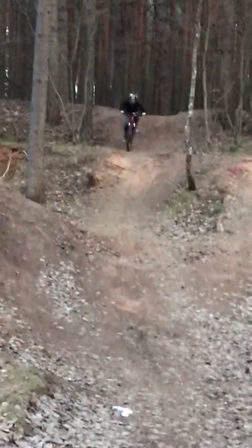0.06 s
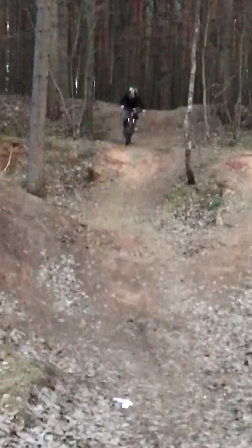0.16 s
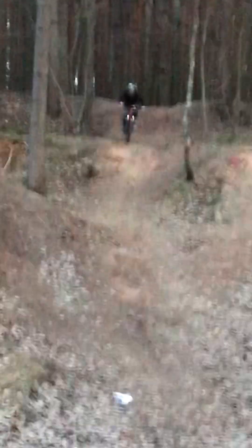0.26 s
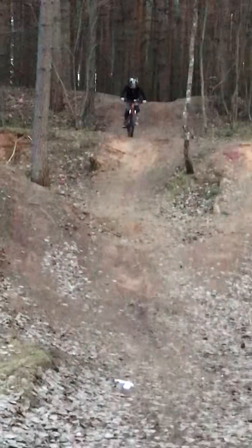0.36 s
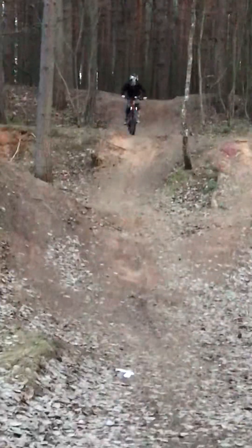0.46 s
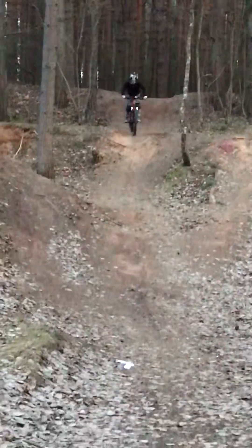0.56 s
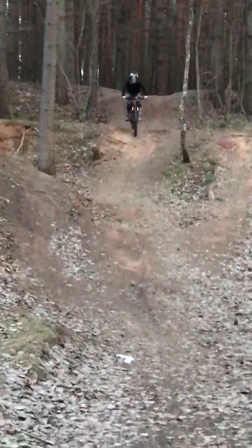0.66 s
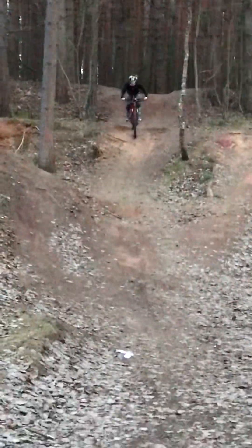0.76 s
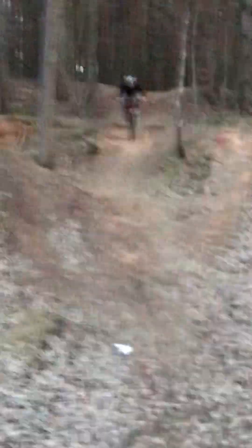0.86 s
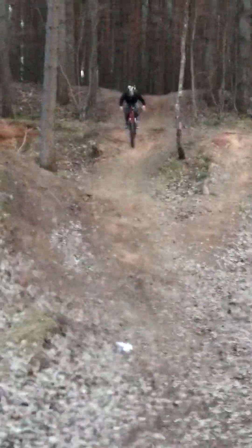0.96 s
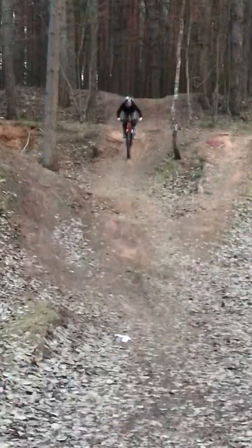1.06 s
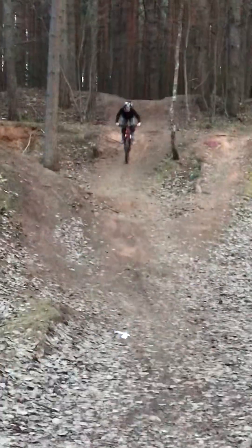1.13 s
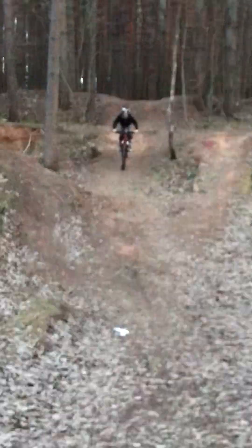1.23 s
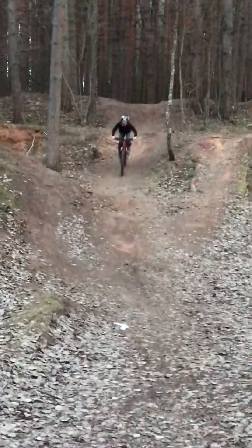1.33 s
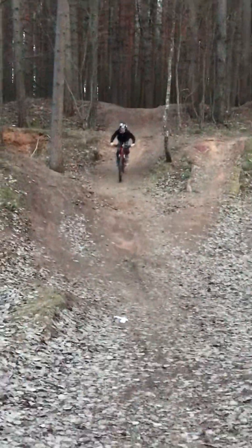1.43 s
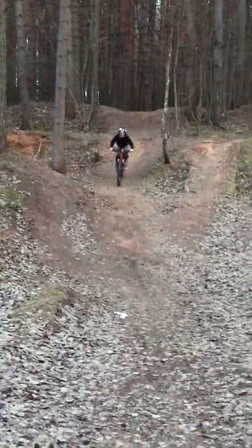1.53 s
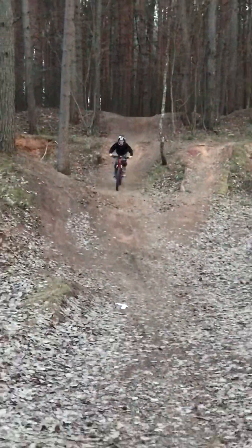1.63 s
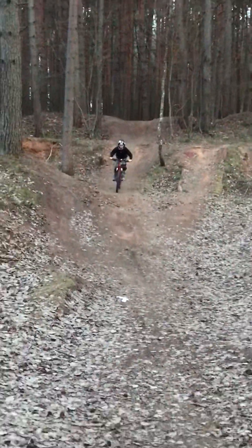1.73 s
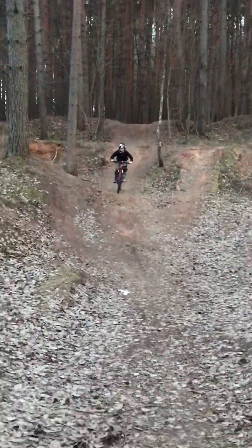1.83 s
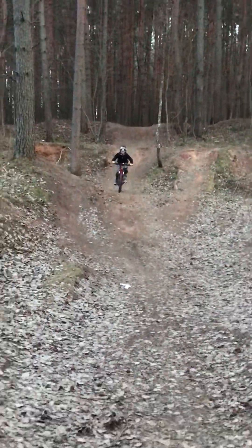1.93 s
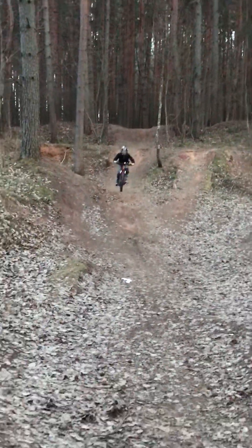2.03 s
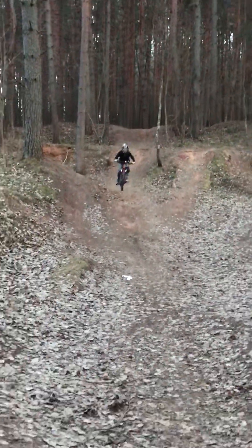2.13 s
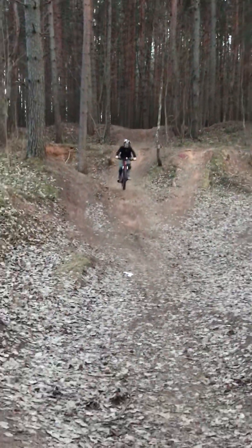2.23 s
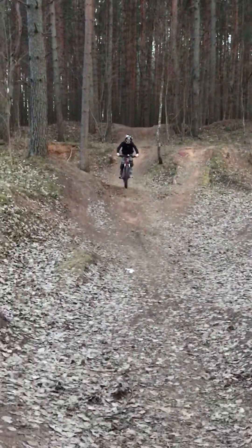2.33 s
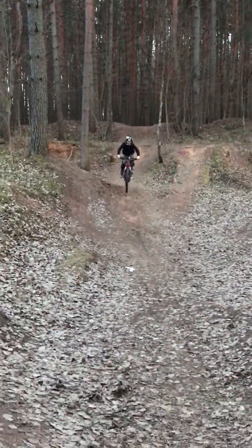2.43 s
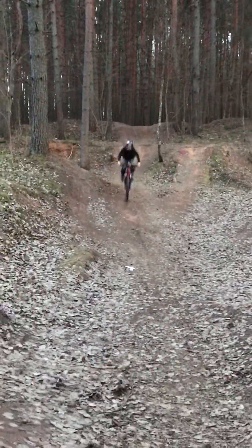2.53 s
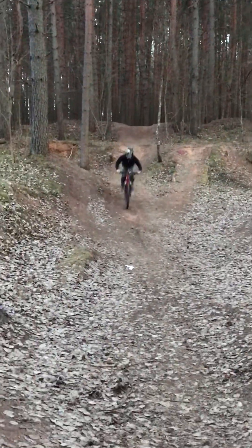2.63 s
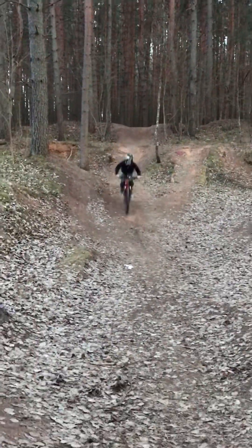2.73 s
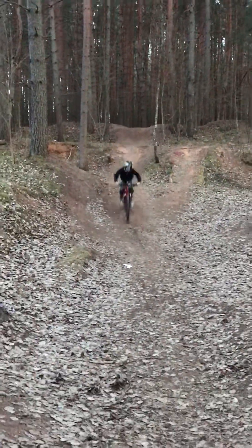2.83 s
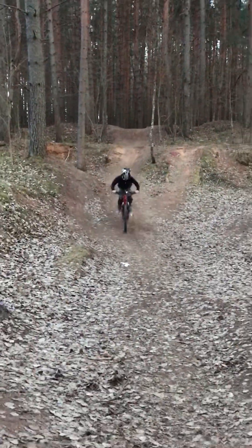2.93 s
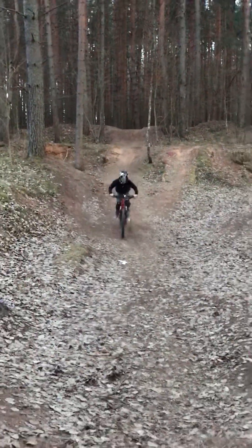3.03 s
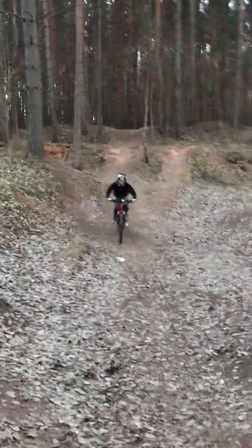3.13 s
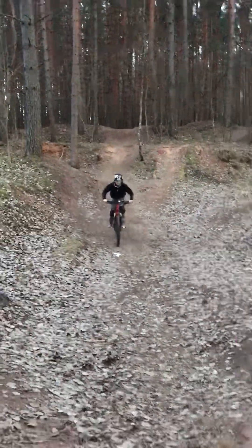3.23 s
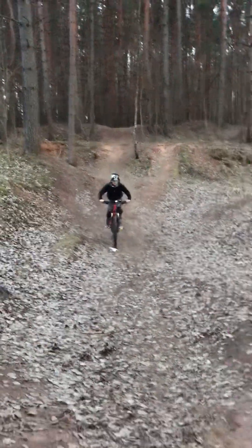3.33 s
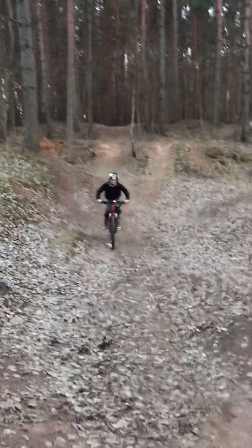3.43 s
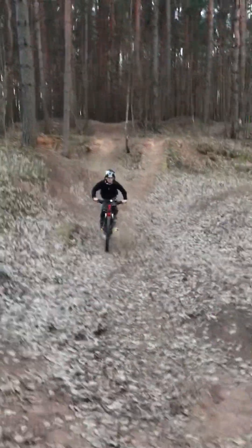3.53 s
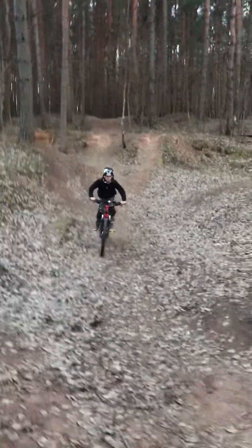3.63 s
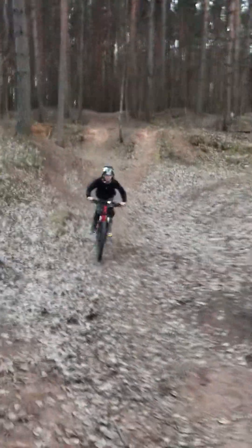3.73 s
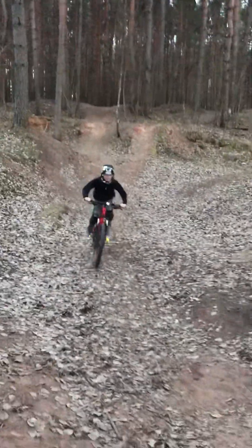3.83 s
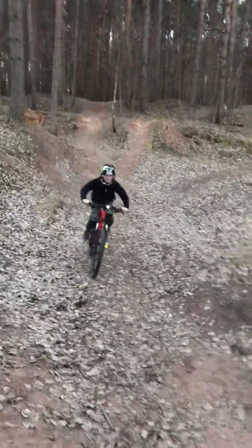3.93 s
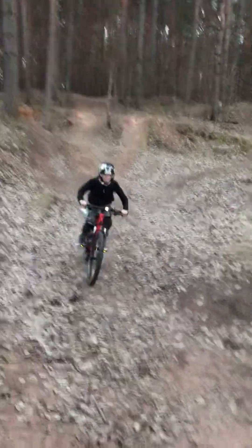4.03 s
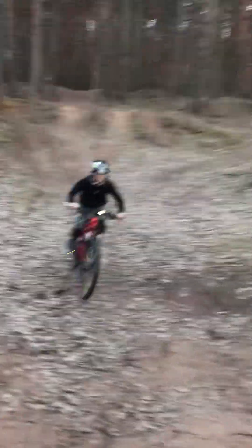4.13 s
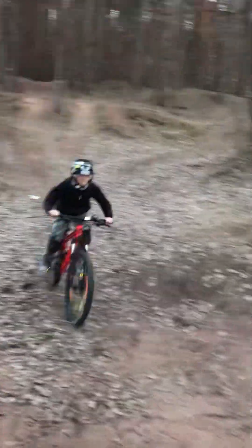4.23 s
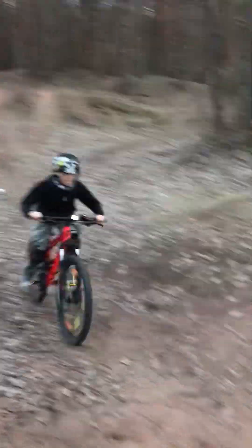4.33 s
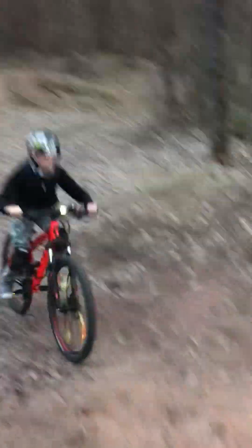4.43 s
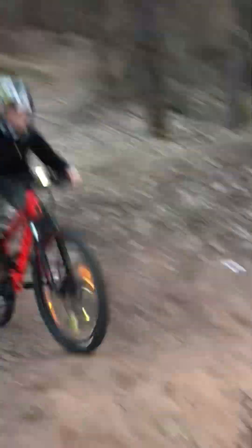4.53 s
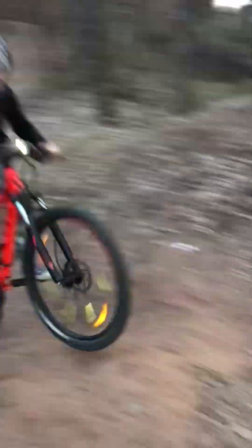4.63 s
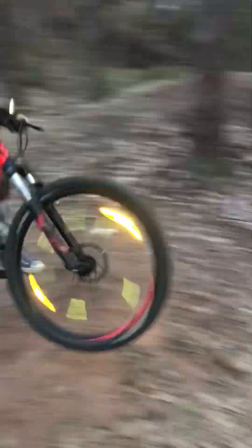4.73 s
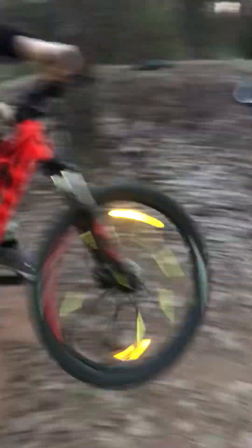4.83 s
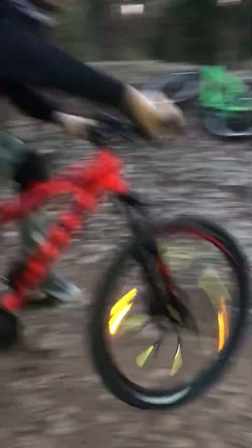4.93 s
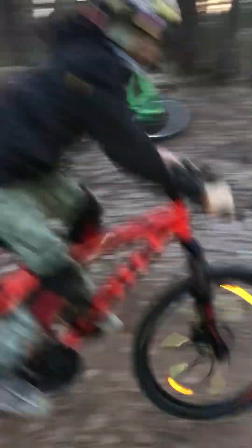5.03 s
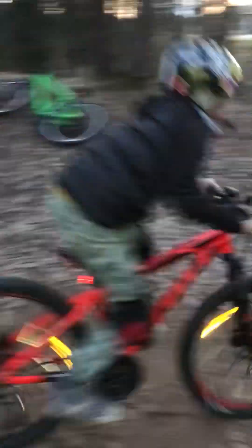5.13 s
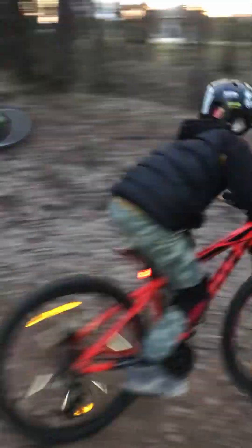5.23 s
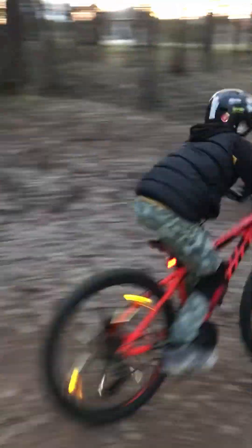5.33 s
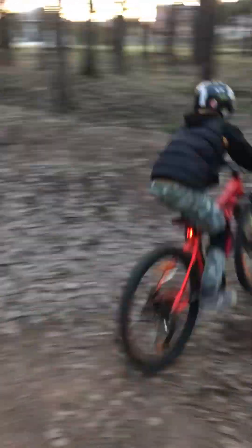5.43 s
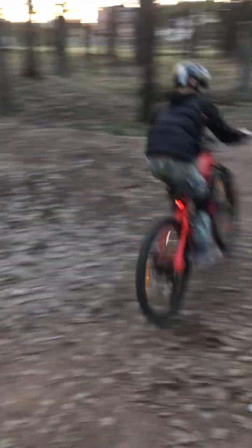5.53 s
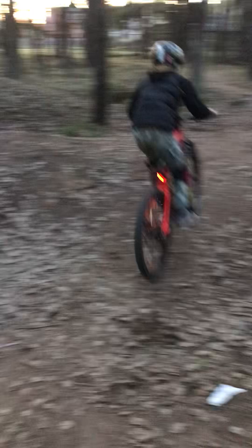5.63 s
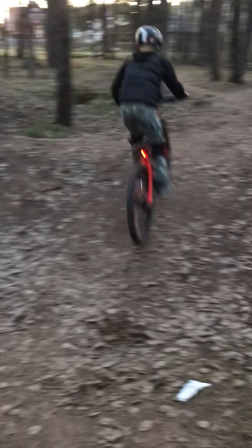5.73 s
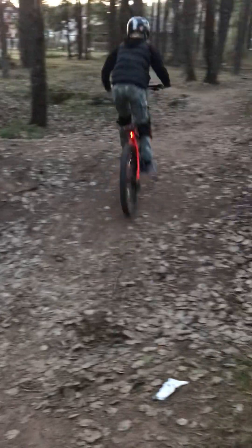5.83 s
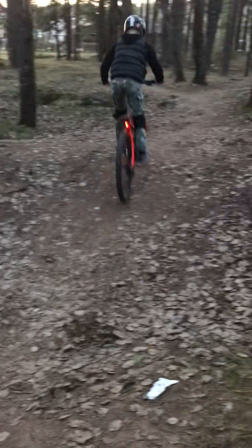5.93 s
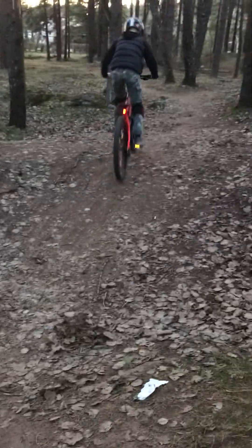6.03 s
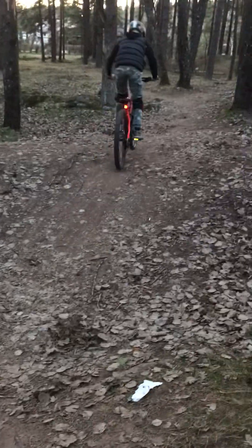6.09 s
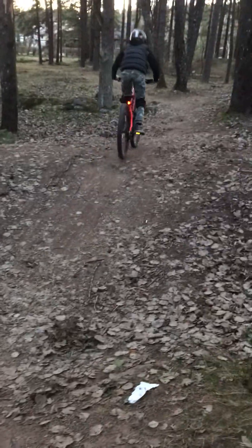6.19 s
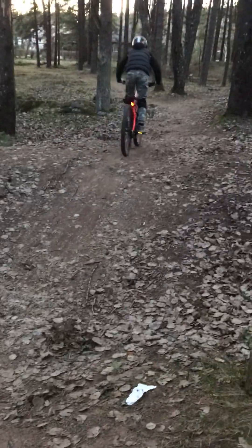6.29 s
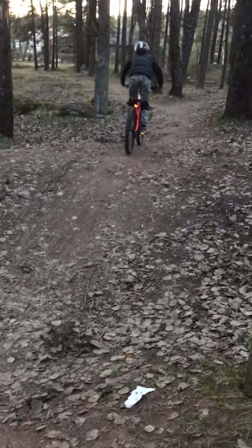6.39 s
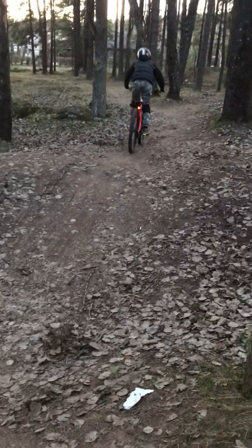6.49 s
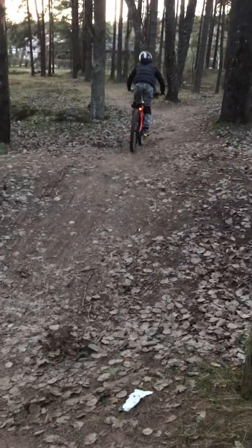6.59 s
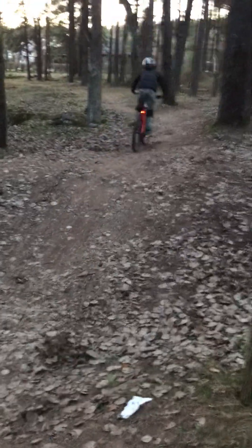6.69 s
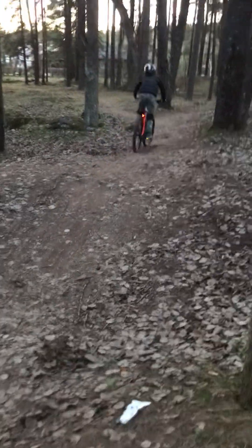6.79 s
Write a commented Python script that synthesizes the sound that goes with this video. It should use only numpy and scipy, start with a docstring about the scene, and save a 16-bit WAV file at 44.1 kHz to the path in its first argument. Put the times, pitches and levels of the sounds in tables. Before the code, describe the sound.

Quiet pine woods with bird calls; a rattling mountain bike approaches, bursts by in a clash of chain and thuds, then fades over leaves.

```python
"""Dirt trail in a pine forest: a child's mountain bike coasts down, passes close by and rolls away.
Tyres: filtered grit, stones and leaf crackle, plus a tread hum locked to the metres rolled.
Chain slaps, freewheel ticks, knocks and pebbles: noise bursts or clicks through filters and decaying modes.
Shaped noise gives forest hush, breeze and the puff of air as the bike passes; gliding sines the songbirds.
A faint low drone swells near the end; noise tails add the echo from the trunks."""
import sys
import numpy as np
from scipy import signal
from scipy.fft import rfft, irfft, next_fast_len
from scipy.io import wavfile
from scipy.ndimage import uniform_filter1d

SR = 44100
rng = np.random.default_rng(int(sys.argv[2]) if len(sys.argv) > 2 else 0)


def dump(signal):
    """Clip the signal to [-1, 1] and save it as 16-bit WAV at the path in sys.argv[1]."""
    limited = np.clip(np.atleast_2d(signal).T, -1, 1)
    pcm = np.round(limited * 32767).astype(np.int16)
    wavfile.write(sys.argv[1], SR, pcm)


N = 302248
TIME = np.arange(N) / SR

# wheel modes: f/Hz, relative level/dB, t60/s
WHEEL_MODES = [(312, -8.5, 0.026), (370, -10, 0.012), (719, 3, 0.051), (786, -1, 0.0074), (994, 0, 0.032),
               (1366, -1.5, 0.0048), (1684, -6.5, 0.03), (2200, -10, 0.022), (4150, -0.5, 0.016)]
# chain clash spectrum: f/Hz, relative density/dB
CHAIN_SPECTRUM = [(400, -6), (1200, -1.5), (2400, -2.5), (3050, 2.5), (3600, -0.5), (4300, 1), (5200, -3.5),
                  (6800, -1), (7800, -7), (9100, -1.5), (10400, -10.5), (12500, -6), (15500, -12.5)]
SLAP_T60_S = 0.026


def from_db(db):
    """Decibels to amplitude gain."""
    return 10 ** (np.asarray(db) / 20)


def rms_one(x):
    """Scale to unit power."""
    return x / np.sqrt(np.mean(x ** 2) + 1e-20)


def peak_one(x, size=128):
    """Scale so that the loudest window (size in samples) has unit power."""
    return x / np.sqrt(uniform_filter1d(x ** 2, size).max())


def in_time(rows):
    """Interpolate each column of a t/s-keyed table at every sample."""
    t_s, *columns = np.transpose(rows)
    return [np.interp(TIME, t_s, column) for column in columns]


def add(out, t_s, sound):
    """Mix a sound in at t_s, in place."""
    i = max(int(t_s * SR), 0)
    out[i:i + len(sound)] += sound[:N - i]


def drift(knots_per_s):
    """Random knots joined by straight lines, unit power."""
    knots = rng.standard_normal(int(N / SR * knots_per_s) + 3)
    return rms_one(np.interp(TIME * knots_per_s, np.arange(len(knots)), knots))


def low_pass(x, cut_hz, order=2):
    """Butterworth low-pass."""
    sos = signal.butter(order, min(cut_hz, .45 * SR), fs=SR, output="sos")
    return signal.sosfilt(sos, x)


def band_pass(x, band_hz, order):
    """Butterworth band-pass."""
    return signal.sosfilt(signal.butter(order, band_hz, "band", fs=SR, output="sos"), x)


def colour(x, spectrum, tilt_db=0):
    """Minimum-phase filter; tilt_db per octave applies above the spectrum's second point."""
    n = 2 * next_fast_len(len(x) // 2 + 512, real=True)
    octave = np.log2(np.maximum(np.arange(n // 2 + 1) * SR / n, 10))
    hz, db = np.transpose(spectrum)
    gain_db = np.interp(octave, np.log2(hz), db)
    gain_db = gain_db + tilt_db * np.clip(octave - np.log2(hz[1]), 0, None)
    # fold the cepstrum to its causal half
    cepstrum = irfft(np.log(from_db(gain_db)))
    cepstrum[1:n // 2] *= 2
    cepstrum[n // 2 + 1:] = 0
    return irfft(rfft(x, n) * np.exp(rfft(cepstrum)))[:len(x)]


def patchy(spectrum, spread_db):
    """Contacts differ: offset each point of the spectrum at random."""
    return [(hz, db + spread_db * rng.standard_normal()) for hz, db in spectrum]


def ring(x, hz, t60_s):
    """Two-pole resonator: a unit click starts a decaying sine of height 1."""
    r = from_db(-60 / (t60_s * SR))
    w = 2 * np.pi * hz / SR
    return signal.lfilter([0, np.sin(w)], [1, -2 * r * np.cos(w), r * r], x + 1e-18)


def struck(x, modes, spread_db):
    """Drive modes of alternating sign, each with a random strength per blow."""
    total = 0
    for k, (hz, db, t60_s) in enumerate(modes):
        strength = from_db(db + spread_db * rng.standard_normal())
        total = total + (-1) ** k * strength * ring(x, hz, t60_s)
    return total


def burst(t60_s, rise_s, size=16384):
    """Swarm of tiny contacts: noise that builds up and dies away."""
    t = TIME[:size]
    envelope = (1 - np.exp(-t / rise_s)) * from_db(-60 * t / max(t60_s, .002))
    return rng.standard_normal(size) * envelope


def grains(per_s, spread_db):
    """Random clicks of either sign, many small and a few large."""
    sizes = from_db(spread_db * np.minimum(rng.exponential(1, N), 4))
    return (rng.random(N) < per_s / SR) * sizes * rng.choice([-1, 1], N)


def crackle(per_s, t60_s):
    """Envelope of many random breaks, each decaying within milliseconds; unit power."""
    breaks = np.abs(grains(per_s, spread_db=3.8))
    return rms_one(signal.lfilter([1], [1, -from_db(-60 / (t60_s * SR))], breaks + 1e-18))


def trunks(x, t60_s, cut_hz):
    """Tree trunks scatter sound: convolve with a decaying noise tail of unit energy."""
    tail = low_pass(burst(t60_s, rise_s=0.0022, size=SR), cut_hz)
    return signal.fftconvolve(x, tail / np.sqrt(np.sum(tail ** 2)))[:N]


def path():
    """Straight trail: metres rolled from the integrated speed, and distance from the microphone."""
    # bike speed: t/s, v/(m/s)
    speed_rows = [(0, 4.6), (2.5, 4.35), (3.2, 4.97), (3.6, 4.9), (3.95, 5.15), (5.42, 5.15), (5.5, 4.25),
                  (5.58, 5.0), (5.72, 5.15), (6.85, 4.3)]
    pass_s, closest_m = 5.19, 0.42
    speed, = in_time(speed_rows)
    rolled_m = np.cumsum(speed) / SR
    along_m = rolled_m - np.interp(pass_s, TIME, rolled_m)
    return rolled_m, np.hypot(closest_m, along_m)


def forest_hush():
    """Steady noise with the forest's spectrum."""
    # forest: f/Hz, relative density/dB
    forest_spectrum = [(60, -15), (105, -4), (160, -21.5), (300, -7.5), (450, -8), (750, -1.5),
                       (1050, -8.5), (1400, -16.5), (1900, -14.5), (2600, -27.5), (4000, -20), (5200, -27),
                       (10500, -32.5), (15000, -29)]
    return from_db(-64) * rms_one(colour(rng.standard_normal(N), forest_spectrum))


def air():
    """Air over the microphone: a breeze varying at random, and the bike's wake as a sudden puff."""
    # breeze before gusts: t/s, level/dB
    air_rows = [(0, -64.5), (1.4, -62), (2.7, -58.5), (3.9, -61), (4.5, -55), (5.0, -60.5), (5.6, -54),
                (6.3, -57.5), (6.85, -61.5)]
    # bike's wake, a weaker eddy behind it: t/s, level/dB
    wake_rows = [(5.098, -86), (5.11, -30), (5.14, -33), (5.165, -45.5), (5.32, -47), (5.42, -64),
                 (5.47, -44), (5.53, -69)]
    # breeze on the microphone: f/Hz, relative density/dB
    buffet_spectrum = [(18, -44), (30, -23), (44, -2), (60, 2), (82, -4), (115, -7), (160, -14), (300, -19),
                       (800, -51.5)]
    # wake on the microphone: f/Hz, relative density/dB
    puff_spectrum = [(18, -42), (30, -14), (40, 9.5), (50, -9), (65, 1), (90, -12.5), (130, -1.5),
                     (175, -17.5), (300, -11.5), (800, -72)]
    gust_rms_db, gust_knots_per_s = 2.0, 6
    (air_db,), (wake_db,) = in_time(air_rows), in_time(wake_rows)
    gusty_db = air_db + gust_rms_db * drift(gust_knots_per_s)
    breeze = rms_one(colour(rng.standard_normal(N), buffet_spectrum)) * from_db(gusty_db)
    puff = rms_one(colour(rng.standard_normal(N), puff_spectrum)) * from_db(wake_db)
    return breeze + puff


def tyres(rumble_db, hum_db, rolled_m):
    """Grit rumbles, small stones excite wheel modes; tread knobs hum at a pitch set by speed."""
    # dirt: f/Hz, relative density/dB
    dirt_spectrum = [(110, -4), (170, 6), (300, 3.5), (420, 0), (540, -3), (740, 0.5), (1000, 1.5),
                     (1400, -9), (1900, -2.5), (2500, -15.5), (3200, -21.5), (6000, -26), (16000, -61)]
    knobs_per_m = 62.1
    grit_offset_db, stones_rel_grit_db, hum_offset_db = 2, -6.0, -1.5
    grit = rms_one(colour(grains(per_s=2500, spread_db=3.5), dirt_spectrum))
    stones = 0
    for hz, db, _ in WHEEL_MODES:
        stones = stones + from_db(db) * ring(grains(per_s=25, spread_db=3.0), hz, t60_s=.02)
    stones = rms_one(stones)
    phase = 2 * np.pi * knobs_per_m * rolled_m
    # independent quadrature drifts make the hum waver
    hum = rms_one(drift(75) * np.sin(phase) + drift(75) * np.cos(phase))
    rumble = (grit + from_db(stones_rel_grit_db) * stones) * from_db(rumble_db + grit_offset_db)
    return rumble + hum * from_db(hum_db + hum_offset_db)


def leaves(crunch_db):
    """Big leaves break across all bands at once, small ones each in one band."""
    # dry leaves: f/Hz, relative density/dB
    leaf_spectrum = [(800, -24), (1900, -10), (2500, -5.5), (3100, -1.5), (4300, 2.5), (5300, -3),
                     (7000, 0.5), (7800, -6), (9100, -0.5), (10400, -9), (12500, 0), (15500, -4)]
    leaf_offset_db = 2.5
    edges_hz = np.geomspace(1000, 17000, num=9)
    wide = crackle(per_s=220, t60_s=.008)
    crunch = 0
    for band_hz in zip(edges_hz, edges_hz[1:]):
        envelope = .6 * wide + crackle(per_s=160, t60_s=.008) + .15
        crunch = crunch + band_pass(envelope * rng.standard_normal(N), band_hz, order=2)
    return rms_one(colour(crunch, leaf_spectrum)) * from_db(crunch_db + leaf_offset_db)


def twigs(rumble_db):
    """Twigs and soil crumbs crack under the tyres: clicks dealt at random to 16 short resonances."""
    twig_rel_rumble_db = -3.5
    pitches_hz = np.geomspace(600, 3300, num=16)
    breaks = grains(per_s=750, spread_db=4.0)
    dealt = rng.integers(0, len(pitches_hz), N)
    cracks = sum(ring(breaks * (dealt == k), hz, t60_s=.006) for k, hz in enumerate(pitches_hz))
    return rms_one(np.diff(cracks, prepend=0)) * from_db(rumble_db + twig_rel_rumble_db)


def freewheel(rolled_m, distance_m):
    """Pawls drop over ratchet teeth per metre rolled; bright ticks fall off as 1/distance."""
    ticks_per_m, level_at_1m_db = 7.4, -49
    out = np.zeros(N)
    # one pawl drops at 4.9825 s
    teeth = ticks_per_m * (rolled_m - np.interp(4.9825, TIME, rolled_m))
    for i in np.flatnonzero(np.diff(np.floor(teeth))):
        contact = burst(t60_s=0.015, rise_s=0.0042, size=1024)
        tick = peak_one(colour(contact, patchy(CHAIN_SPECTRUM, spread_db=5.5), tilt_db=7.5))
        t_s = i / SR - .001 + 0.0004 * rng.standard_normal()
        gain = from_db(level_at_1m_db + 1.3 * rng.standard_normal()) / distance_m[i]
        add(out, t_s, tick * gain)
    return out


def rattles(crunch_db):
    """The slack chain rattles lightly, once per time slot at random; level follows the leaf crunch."""
    slots_per_s, rel_crunch_db, spread_db = 6.5, 8, 2.5
    out = np.zeros(N)
    for slot_s in np.arange(0, TIME[-1], 1 / slots_per_s):
        t_s = min(slot_s + rng.random() / slots_per_s, TIME[-1])
        contact = burst(SLAP_T60_S, rise_s=.0009, size=2048)
        clash = peak_one(colour(contact, patchy(CHAIN_SPECTRUM, spread_db=3.0), tilt_db=0.0))
        level_db = np.interp(t_s, TIME, crunch_db) + rel_crunch_db + spread_db * rng.standard_normal()
        add(out, t_s, clash * from_db(level_db))
    return out


def chain():
    """Links gather into a clash, rebound twice, jiggle on and set the drivetrain ringing."""
    # chain and derailleur slaps: t/s, clash level/dB, brightness/(dB/octave)
    slap_rows = [(0.0326, -52.5, -7.5), (0.3672, -53, 0), (.536, -61, -1), (.79, -59.5, -1),
                 (.999, -59, -1.5), (1.461, -62, 2), (1.6403, -57, 4), (1.763, -56.5, -2.5),
                 (2.0665, -57, 0), (2.192, -55.5, -1), (2.655, -54.5, -3), (2.7254, -43, 4),
                 (2.7554, -46.5, -3.5), (2.8297, -42, 5), (2.85, -34, 1.5), (2.862, -45, 7),
                 (3.1505, -42.5, 1.5), (3.2958, -46.5, 4), (3.4462, -42.5, 2.5), (3.9613, -42.5, 2.5),
                 (4.028, -47, 3), (4.0968, -44, 4), (4.2227, -41, 1), (4.2366, -36, 8), (4.5115, -39, 1),
                 (4.5678, -40.5, 3), (4.6334, -40, 2), (4.697, -37, 3.5), (4.8233, -40, 0.5),
                 (5.1079, -40, 4), (5.12, -34, -1), (5.1388, -23, 3.5), (5.1661, -34.5, 4),
                 (5.1914, -34.5, -2), (5.2017, -32, 6), (5.222, -36, -0.5), (5.2503, -42, -6),
                 (5.261, -30, -6), (5.2722, -19, 2), (5.286, -33, 0), (5.298, -33, -1), (5.305, -36.5, 0),
                 (5.3474, -27, 5), (5.351, -24, 3.5), (5.358, -33.5, 0.5), (5.392, -43, 1),
                 (5.419, -42.5, -6), (5.5171, -37, -2), (5.9238, -44, 2.5), (6.1848, -40.5, 5.5),
                 (6.317, -43, 2), (6.7454, -51, 4)]
    # metal drivetrain modes: f/Hz, relative level/dB, t60/s
    metal_modes = [(1700, 4, 0.057), (2156, 1, 0.069), (2810, 6, 0.028), (3320, -7, 0.065), (3730, 3, .045),
                   (3930, -3, .07), (4370, 4, 0.074), (4490, -1, 0.057), (5320, -11, 0.047),
                   (6150, -13, .06), (7200, -14, .04), (9000, -11, .035)]
    rebound_s, rebound_loss_db = .014, 20
    ring_rel_clash_db, ring_db_per_tilt = -16.5, 0.53   # a duller slap rings less
    lead_samples = 400
    out = np.zeros(N)
    for t_s, level_db, tilt_db in slap_rows:
        jiggle = burst(t60_s=0.077, rise_s=0.0036)
        links = peak_one(burst(SLAP_T60_S, rise_s=0.00061)) + from_db(-14.5) * jiggle
        for k in (1, 2):
            rebound = peak_one(burst(SLAP_T60_S, rise_s=.0009, size=2048))
            delay_s = k * rebound_s * rng.uniform(.9, 1.1)
            add(links, delay_s, from_db(-rebound_loss_db) * rebound)
        # time-reversed decay swells into the clash
        gathering = from_db(-13.0) * burst(t60_s=0.039, rise_s=.0001, size=lead_samples)[::-1]
        links = np.concatenate([gathering, links])
        clash = peak_one(colour(links, patchy(CHAIN_SPECTRUM, spread_db=3.0), tilt_db))
        ringing = peak_one(struck(links, metal_modes, spread_db=4.5))
        ring_gain = from_db(ring_rel_clash_db + ring_db_per_tilt * tilt_db)
        add(out, t_s - lead_samples / SR, from_db(level_db) * (clash + ring_gain * ringing))
    return out


def whistle(phrase, tremble, flutter_db):
    """Sine gliding along (t/s, f/Hz, level/dB) points, trembling in pitch, fluttering in level."""
    t_s, hz, db = np.transpose(phrase)
    t = np.arange(t_s[0], max(t_s[-1], t_s[0] + .01), 1 / SR)
    # 300 and 130 random knots per second
    shake, flutter = (np.interp((t - t_s[0]) * rate, np.arange(128), rng.standard_normal(128))
                      for rate in (300, 130))
    edges = np.clip(np.minimum(t - t[0], t[-1] - t) / .004, 0, 1)
    phase = 2 * np.pi * np.cumsum(np.interp(t, t_s, hz) * (1 + tremble * shake)) / SR
    level = from_db(np.interp(t, t_s, db) + flutter_db * flutter)
    return edges * level * np.sqrt(2) * np.sin(phase)


def bird():
    """A songbird calls five times; a farther, more echoing one whistles thin glides."""
    # near bird's calls, one list each, before the direct/echo mix: t/s, f/Hz, level/dB
    song_calls = [
        [(1.147, 2120, -65), (1.161, 2655, -58), (1.177, 2834, -58), (1.205, 2870, -58), (1.236, 2790, -63),
         (1.247, 2960, -48), (1.257, 2585, -55), (1.284, 2584, -46), (1.294, 2520, -57), (1.32, 2370, -64)],
        [(1.779, 2150, -67), (1.792, 2530, -59), (1.81, 2627, -59), (1.821, 2840, -60), (1.848, 2930, -54),
         (1.858, 3200, -56), (1.865, 2634, -53), (1.892, 2520, -59), (1.921, 2413, -54.5), (1.932, 2320, -63)],
        [(2.374, 2150, -74), (2.382, 2600, -55.5), (2.412, 2650, -61.5), (2.432, 2680, -74),
         (2.451, 2910, -55.5), (2.463, 3200, -64), (2.473, 2634, -55), (2.483, 2590, -48.5), (2.495, 2520, -64),
         (2.545, 2426, -52), (2.559, 2120, -57)],
        [(3.007, 2356, -68), (3.04, 2630, -53), (3.053, 2680, -75), (3.075, 2950, -62), (3.099, 3080, -60),
         (3.11, 2680, -60), (3.135, 2450, -63), (3.16, 2320, -52), (3.182, 2230, -59)],
        [(3.658, 2205, -67), (3.685, 2450, -62), (3.708, 2710, -65), (3.72, 2350, -67), (3.76, 2090, -70)],
    ]
    # far bird's glides, before the direct/echo mix: t/s, length/s, start f/Hz, end f/Hz, level/dB
    far_notes = [(0.331, 0.06, 3410, 3640, -70), (0.568, .07, 3520, 3850, -77),
                 (0.691, 0.0507, 3640, 3900, -68), (.755, 0.068, 3620, 3940, -69.5),
                 (1.696, .13, 5170, 4840, -79), (1.833, 0.1, 4620, 4250, -72),
                 (1.947, .12, 4180, 3950, -73)]
    # a faint rising note precedes each call
    lead_s, lead_length_s, lead_hz, lead_top_hz, lead_db = 0.0333, .025, 3020, 3260, -71.5
    near_direct_db, near_scatter_db, near_echo_db = -.5, -17, -5.5
    far_direct_db, far_scatter_db, far_echo_db = -6, -7, -5.5
    near, far = np.zeros(N), np.zeros(N)
    for call in song_calls:
        t_s = call[0][0] - lead_s
        lead_in = [(t_s, lead_hz, lead_db), (t_s + lead_length_s, lead_top_hz, lead_db)]
        for phrase in (lead_in, call):
            add(near, phrase[0][0], whistle(phrase, tremble=.015, flutter_db=2.5))
    for t_s, length_s, from_hz, to_hz, db in far_notes:
        glide = [(t_s, from_hz, db), (t_s + length_s, to_hz, db)]
        add(far, t_s, whistle(glide, tremble=.016, flutter_db=5.5))
    direct = from_db(near_direct_db) * near + from_db(far_direct_db) * far
    # the nearest trunks blur both birds
    to_scatter = from_db(near_scatter_db) * near + from_db(far_scatter_db) * far
    to_echo = from_db(near_echo_db) * near + from_db(far_echo_db) * far
    scattered = trunks(to_scatter, t60_s=0.21, cut_hz=15000)
    return direct + scattered + trunks(to_echo, t60_s=1.4, cut_hz=18400)


def snaps():
    """A twig or stiff leaf breaks: one noise crack with a spectral hump at its own centre."""
    # snaps: t/s, peak level/dB, centre f/Hz, t60/s
    snap_rows = [(.83, -60, 1900, .03), (.899, -60, 1900, .03), (1.07, -60, 1950, .03),
                 (1.16, -55, 1750, 0.017), (1.9387, -61, 7000, .02), (2.231, -59, 7000, .02),
                 (2.4426, -61.5, 13000, .03), (2.742, -49, 6000, .02), (2.916, -50, 6000, .015),
                 (2.95, -51, 4500, .015), (3.141, -50, 5500, .015), (3.314, -48.5, 4500, .025),
                 (3.708, -47.5, 2600, 0.018), (3.722, -49, 1800, 0.014), (3.9938, -50, 5030, .012),
                 (4.077, -49, 4000, .015), (4.184, -44, 1800, .012), (4.2862, -47.5, 4000, .015),
                 (4.3044, -44, 2000, .012), (4.341, -45, 5000, .015), (4.4099, -47, 8000, .012),
                 (4.5967, -40.5, 3520, 0.0069), (4.646, -47, 3500, .02), (4.649, -35.5, 5700, 0.012),
                 (4.69, -45, 7000, .015), (5.4977, -42, 11050, 0.01), (5.501, -33, 2000, 0.0048),
                 (5.524, -41, 4000, .015), (5.5495, -43.5, 4000, .008), (5.581, -43.5, 6550, 0.017),
                 (5.6187, -50, 3500, .012), (5.795, -51, 4000, .012), (5.809, -51, 7000, .012),
                 (6.1587, -53, 6000, .015), (6.2756, -50.5, 9000, .012), (6.303, -55, 4000, .025),
                 (6.477, -50, 8000, .012)]
    below_db, above_db = -16, -19.5   # two octaves below and above the centre
    out = np.zeros(N)
    for t_s, level_db, hz, t60_s in snap_rows:
        hump = [(hz / 4, below_db), (hz / 2, .5 * below_db), (hz, 0),
                (hz * 2, .5 * above_db), (hz * 4, above_db)]
        crack = colour(burst(t60_s, rise_s=.0001, size=4096), patchy(hump, spread_db=2.5))
        add(out, t_s, from_db(level_db) * peak_one(crack))
    return out


def pings():
    """A pad brush rings the brake disc; the first landing rings a thin metal part, higher and longer."""
    # disc brushes: t/s, peak level/dB
    ping_rows = [(1.431, -62), (1.462, -54), (1.511, -56), (1.562, -59.5), (1.641, -53), (3.033, -51.5),
                 (3.098, -53), (3.151, -50), (3.192, -51.5)]
    disc_hz, disc_t60_s = 4280, 0.023
    ting_s, ting_db, ting_hz, ting_t60_s = 2.852, -49, 10050, 0.1
    out = np.zeros(N)
    for t_s, level_db in ping_rows:
        brush = burst(t60_s=0.0042, rise_s=0.0006)
        ping = ring(brush, disc_hz * (1 + .02 * rng.standard_normal()), disc_t60_s)
        add(out, t_s, from_db(level_db) * peak_one(ping))
    ting = ring(signal.unit_impulse(SR), ting_hz, ting_t60_s)
    add(out, ting_s, from_db(ting_db) * peak_one(ting))
    return out


def knocks():
    """Roots and stones push the wheel: tyre thud, hollow note and wheel modes; lower cut-off is duller."""
    # knocks: t/s, peak level/dB, contact cut-off f/Hz, contact t60/s, hollow note f/Hz
    knock_rows = [(1.712, -49.5, 1100, 0.046, 1050), (2.209, -52.5, 1210, .037, 1100),
                  (2.715, -48, 1310, 0.3, 760), (2.813, -44, 1300, 0.072, 780),
                  (3.055, -46, 1000, 0.035, 700), (3.454, -44, 476, .056, 288),
                  (3.943, -37, 1200, 0.049, 320), (4.035, -41, 597, 0.031, 310),
                  (4.09, -43, 1500, .02, 795), (4.095, -35.5, 2380, 0.034, 1020),
                  (4.141, -40, 1900, 0.025, 795), (4.157, -44, 2000, 0.018, 1890),
                  (4.186, -41, 1400, 0.053, 350), (4.201, -40, 1400, 0.045, 1120),
                  (4.22, -42.5, 1200, 0.028, 724), (4.253, -38, 1190, 0.033, 337),
                  (4.307, -47, 1600, 0.017, 1300), (4.318, -45, 1200, 0.027, 735),
                  (4.342, -47, 1300, 0.019, 1000), (4.381, -46, 800, .04, 370),
                  (4.397, -39, 1190, 0.042, 990), (4.418, -42.5, 1300, .04, 980),
                  (4.468, -42, 1800, 0.067, 740), (4.519, -46.5, 1490, 0.059, 910),
                  (4.586, -44.5, 1390, 0.09, 1040), (4.619, -43, 1400, 0.027, 1020),
                  (4.717, -48, 2300, .03, 2000), (4.83, -48, 1500, 0.19, 1100),
                  (5.106, -30, 1400, 0.028, 336), (5.123, -38.5, 2207, 0.12, 640),
                  (5.191, -38.5, 1823, .048, 960), (5.2508, -35, 1508, 0.06, 990),
                  (5.297, -38.5, 1400, .08, 1000), (5.34, -45, 1800, .03, 1160),
                  (5.517, -36, 2290, .04, 1200), (5.534, -39.5, 1800, 0.037, 700),
                  (5.631, -44, 1200, .02, 950), (5.722, -44, 1400, 0.04, 1250),
                  (6.252, -48.5, 1200, .04, 960), (6.717, -52, 1500, .05, 895)]
    # tyre thud before the random shift: f/Hz, relative density/dB
    thud_spectrum = [(70, -25), (220, -9.5), (320, 9.5), (490, -7), (760, 2), (1020, 3), (1400, -2),
                     (1800, 2), (2500, -8.5), (5000, 6), (16000, -74)]
    hollow_rel_thud_db, hollow_t60_s, wheel_rel_thud_db = -1.5, 0.026, -9.5
    shift_spread = 0.078   # tyre load shifts each thud: rms of ln(frequency ratio)
    out = np.zeros(N)
    for t_s, level_db, cut_hz, contact_t60_s, note_hz in knock_rows:
        push = low_pass(burst(contact_t60_s, rise_s=0.00038), cut_hz)
        note = peak_one(ring(np.diff(push, prepend=0), note_hz, hollow_t60_s))
        shift = np.exp(shift_spread * rng.standard_normal())
        tyre = patchy([(hz * shift, db) for hz, db in thud_spectrum], spread_db=2.0)
        thud = peak_one(colour(push, tyre))
        wheel = peak_one(struck(push, WHEEL_MODES, spread_db=9.0))
        knock = thud + from_db(hollow_rel_thud_db) * note + from_db(wheel_rel_thud_db) * wheel
        add(out, t_s, from_db(level_db) * peak_one(knock))
    return out


def slide(t_s, length_s):
    """Linear attack, hold and release of one skid, 0-1."""
    attack_s, release_s = .012, 0.022
    rise = (TIME - t_s) / attack_s
    fall = 1 - (TIME - t_s - length_s) / release_s
    return np.clip(np.minimum(rise, fall), 0, 1)


def skids():
    """Tyres skid after a jump: extra leaf crunch in dB, and dense grit scraped along the soil."""
    # skids: t/s, length/s, extra crunch/dB, scrape level/dB
    skid_rows = [(2.712, 0.19, 5.5, -57), (5.106, 0.056, 9, -36), (5.187, 0.117, -1, -41.5)]
    # soil scrape: f/Hz, relative density/dB
    scrape_spectrum = [(60, -14), (130, 4), (400, 2.5), (580, -2), (1000, 4), (1600, -7.5), (2200, -7.5),
                       (3000, -1), (4500, -11.5), (6000, -10), (15000, -20)]
    extra_db = sum(crunch_db * slide(t_s, length_s) for t_s, length_s, crunch_db, _ in skid_rows)
    drag = sum(from_db(db) * slide(t_s, length_s) for t_s, length_s, _, db in skid_rows)
    scrape = rms_one(colour(grains(per_s=2200, spread_db=4.0), scrape_spectrum))
    return extra_db, drag * scrape


def boom():
    """The landing squashes the tyre, which rings low."""
    out = np.zeros(N)
    tone = ring(signal.unit_impulse(SR), hz=126.4, t60_s=0.44)
    add(out, 5.194, from_db(-33.5) * tone)
    return out


def clunk():
    """The rear wheel lands: a load building over milliseconds drives the bike's hollow modes."""
    # loaded-bike modes: f/Hz, peak level/dB, t60/s
    clunk_modes = [(750, -31.5, .05), (914, -32.5, 0.05), (1020, -30.5, .05), (1310, -46, 0.031),
                   (1720, -37, .025)]
    out = np.zeros(N)
    load = burst(t60_s=0.043, rise_s=.012)
    add(out, 5.256, sum(from_db(db) * peak_one(ring(load, hz, t60_s)) for hz, db, t60_s in clunk_modes))
    return out


def clang():
    """The chain strikes the frame: a brief noise blow rings its modes."""
    # frame modes: f/Hz, peak level/dB, t60/s
    frame_modes = [(1065, -41.5, 0.27), (1685, -53, 0.18), (2190, -29.5, 0.038), (2585, -41, 0.22),
                   (2970, -25.5, 0.046), (4670, -36, 0.039), (5000, -42, .1), (5880, -37.5, 0.062),
                   (8140, -35, .03)]
    out = np.zeros(N)
    blow = burst(t60_s=0.0018, rise_s=0.00033)
    add(out, 5.354, sum(from_db(db) * peak_one(ring(blow, hz, t60_s)) for hz, db, t60_s in frame_modes))
    return out


def pebbles():
    """A pebble pinched under the tyre shoots out: gritty crack, tyre thump and rim modes."""
    # pebbles: t/s, thump gain/dB, thump f/Hz, thump t60/s, crack peak level/dB, crack f/Hz, rim gain/dB
    pebble_rows = [(5.5018, -21.5, 1420, 0.0096, -24.5, 10600, -42.5),
                   (5.6520, -9, 1040, 0.0044, -25.5, 3800, -35)]
    # rim modes: f/Hz, relative level/dB, t60/s
    rim_modes = [(335, 5.5, 0.026), (498, -8, 0.21), (680, -0.5, 0.19), (832, 4, 0.085),
                 (1310, -4.5, 0.064), (1750, 1, 0.042), (2150, 1, 0.028)]
    out = np.zeros(N)
    release = signal.unit_impulse(2 ** 14)
    rim = struck(release, rim_modes, spread_db=0)
    for t_s, thump_db, thump_hz, thump_t60_s, crack_db, crack_hz, rim_db in pebble_rows:
        thump = ring(release, thump_hz, thump_t60_s)
        grit = burst(t60_s=0.0038, rise_s=.0001)
        band_hz = np.clip([.65 * crack_hz, 1.4 * crack_hz], 100, .45 * SR)
        crack = peak_one(band_pass(grit, band_hz, order=1))
        add(out, t_s, from_db(crack_db) * crack - from_db(thump_db) * thump - from_db(rim_db) * rim)
    return out


def drone():
    """Faint low sine, wavering slightly in pitch, that swells near the end."""
    # drone: t/s, RMS level/dB
    drone_rows = [(5.9, -70), (6.15, -51.5), (6.5, -59), (6.85, -62)]
    fade_in_s = .3   # ends at the first row
    level_db, = in_time(drone_rows)
    swell = np.clip(1 + (TIME - drone_rows[0][0]) / fade_in_s, 0, 1)
    hz = 63 + 1.5 * drift(4.6)
    return swell * from_db(level_db) * np.sqrt(2) * np.sin(2 * np.pi * np.cumsum(hz) / SR)


def scene():
    """Mix bike, its echo (relatively stronger with distance) and the forest background."""
    # ride, before layer offsets, bumps and ground loss: t/s, rumble/dB, leaf crunch/dB, tread hum/dB
    ride_rows = [(0.0, -66.5, -81, -70), (1.07, -65, -75.5, -88), (1.62, -58.5, -69.5, -63.5),
                 (2.63, -68.5, -82, -65.5), (2.67, -59, -68.5, -63), (2.88, -57, -70, -62),
                 (3.43, -58, -61.5, -52), (3.83, -59, -64.5, -64), (3.89, -59, -66.5, -54),
                 (4.18, -56, -59, -53.5), (4.43, -52.5, -55.5, -47.5), (4.65, -54.5, -57.5, -60),
                 (4.77, -59.5, -66, -71), (5.07, -63.5, -66.5, -83), (5.11, -58.5, -60, -56),
                 (5.3, -51, -56.5, -51), (5.46, -50, -58, -57), (5.53, -54, -60, -47.5),
                 (5.75, -58.5, -65.5, -53.5), (5.93, -60.5, -65.5, -59), (6.3, -61, -68.5, -66),
                 (6.77, -64.5, -70, -69), (6.85, -67, -72, -78)]
    bump_rms_db, bump_knots_per_s = 2.15, 45   # uneven ground makes the rolling lurch
    ground_loss_db_per_m = 0.5   # forest floor soaks up the rolling sound
    echo_at_1m_db, echo_db_per_doubling = -24.5, 3.5
    skid_grit_share = 0.5
    rumble_db, crunch_db, hum_db = in_time(ride_rows)
    rolled_m, distance_m = path()
    background = forest_hush() + air() + bird() + drone()

    skid_db, scrape = skids()
    rolling = tyres(rumble_db + skid_grit_share * skid_db, hum_db, rolled_m)
    rolling = rolling + leaves(crunch_db + skid_db) + twigs(rumble_db)
    bumps_db = bump_rms_db * drift(bump_knots_per_s)
    rolling = rolling * from_db(bumps_db - ground_loss_db_per_m * distance_m)

    drivetrain = freewheel(rolled_m, distance_m) + rattles(crunch_db) + chain()
    impacts = snaps() + pings() + knocks() + boom() + clunk() + clang() + pebbles()
    bike = rolling + scrape + drivetrain + impacts
    echo_db = echo_at_1m_db + echo_db_per_doubling * np.log2(distance_m)
    echoes = trunks(bike * from_db(echo_db), t60_s=0.51, cut_hz=12300)
    return (bike + echoes + background)[None]


def record(dry):
    """Microphone: 38 Hz high-pass, then a steep elliptic low-pass at 16.1 kHz."""
    thinned = signal.sosfilt(signal.butter(6, 38, "high", fs=SR, output="sos"), dry)
    return signal.sosfilt(signal.ellip(10, .1, 80, 16100, fs=SR, output="sos"), thinned)


dry = scene()
out = record(dry)
dump(out)
```